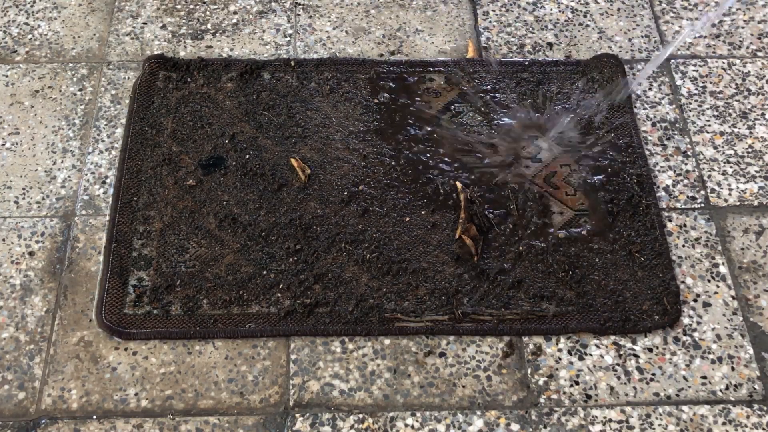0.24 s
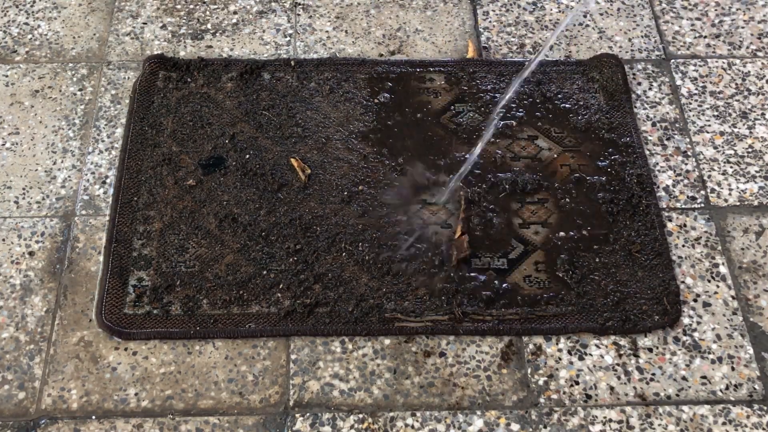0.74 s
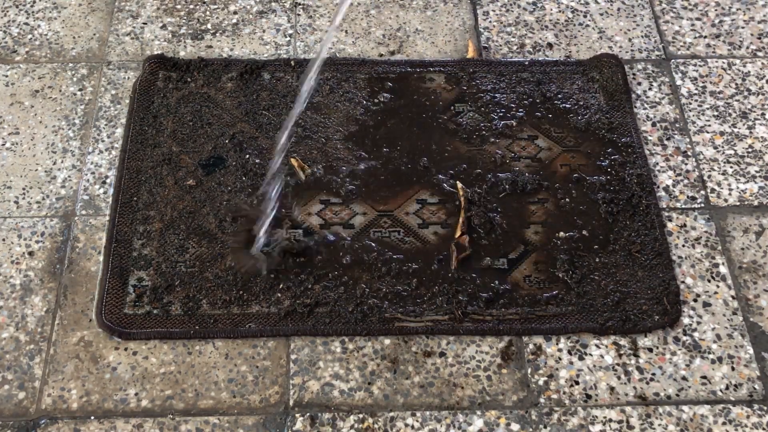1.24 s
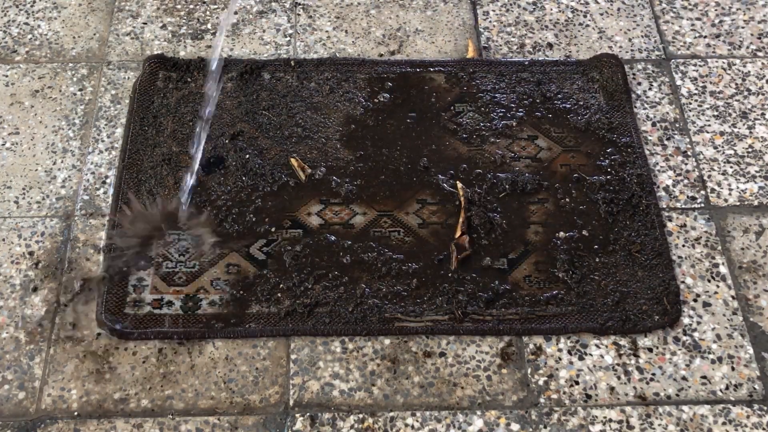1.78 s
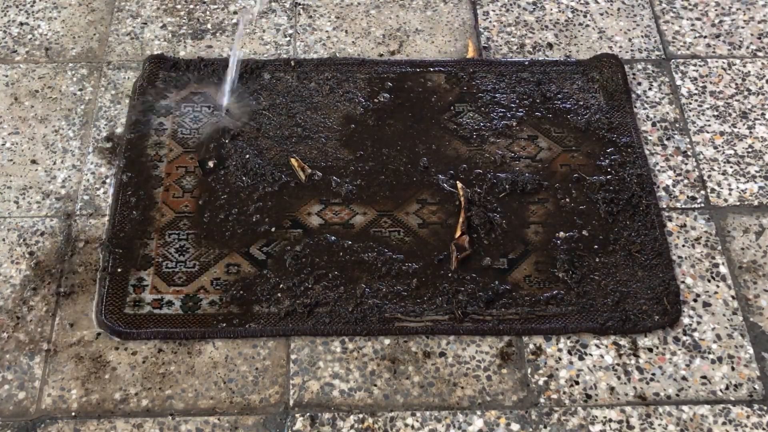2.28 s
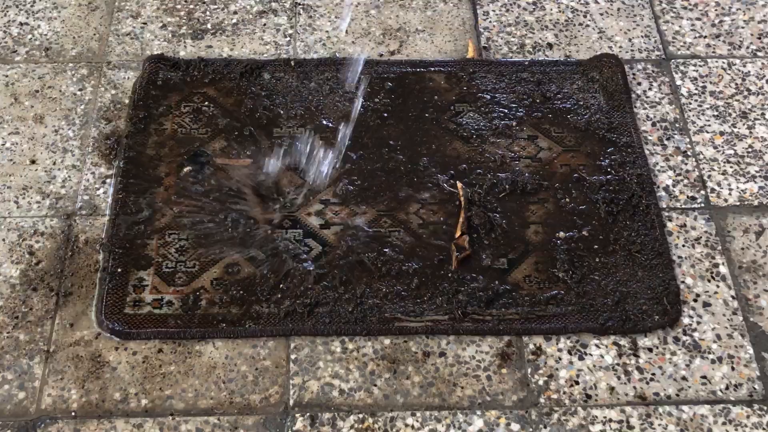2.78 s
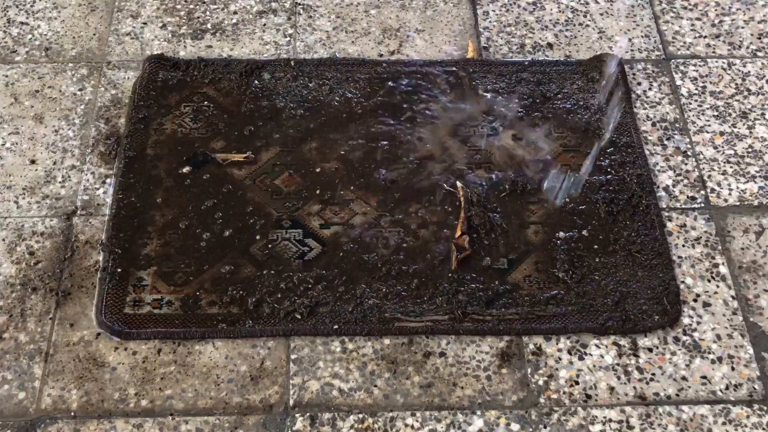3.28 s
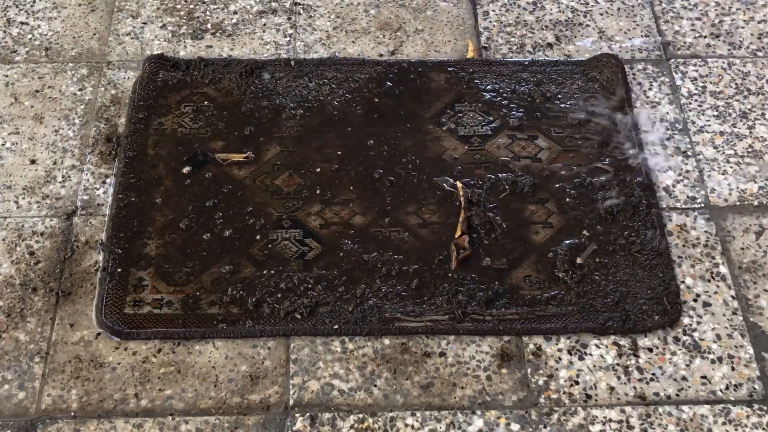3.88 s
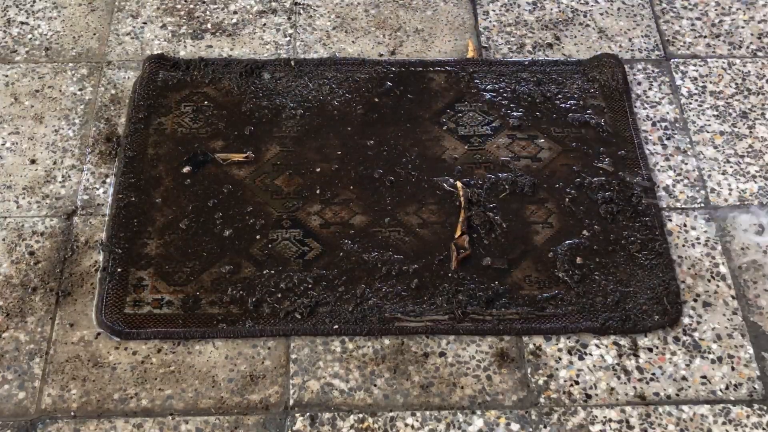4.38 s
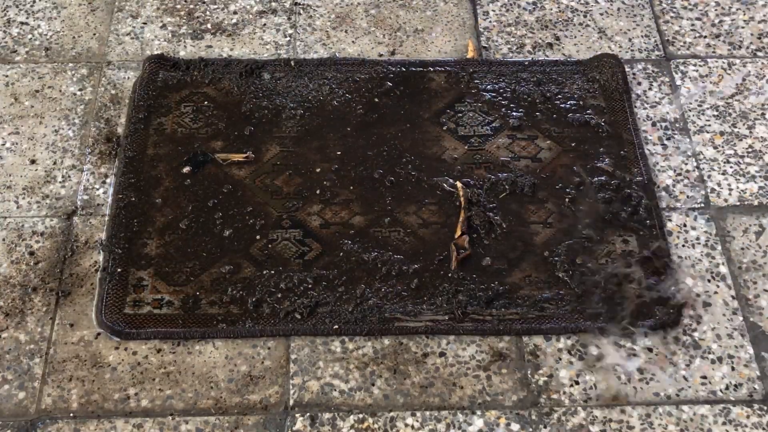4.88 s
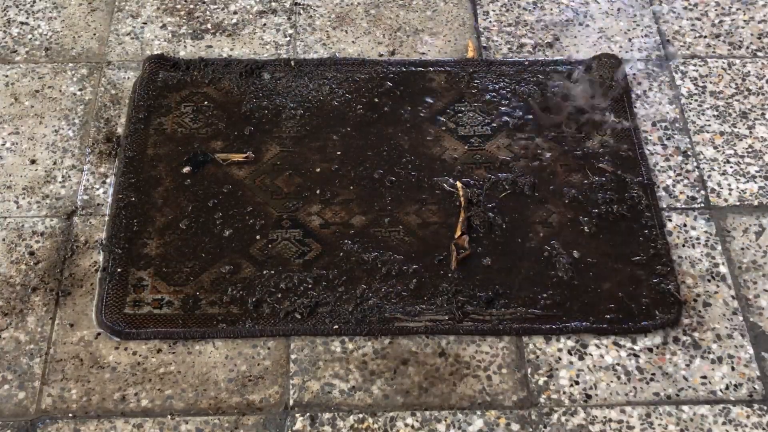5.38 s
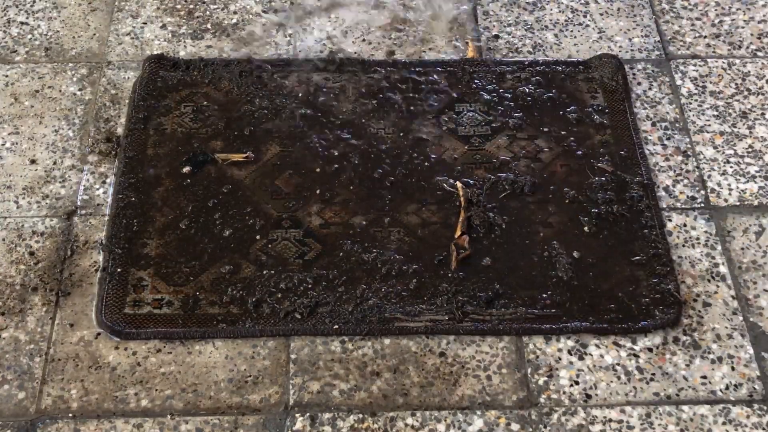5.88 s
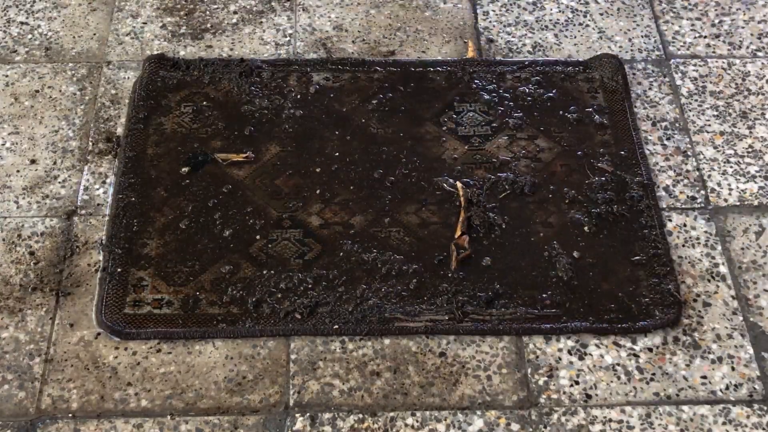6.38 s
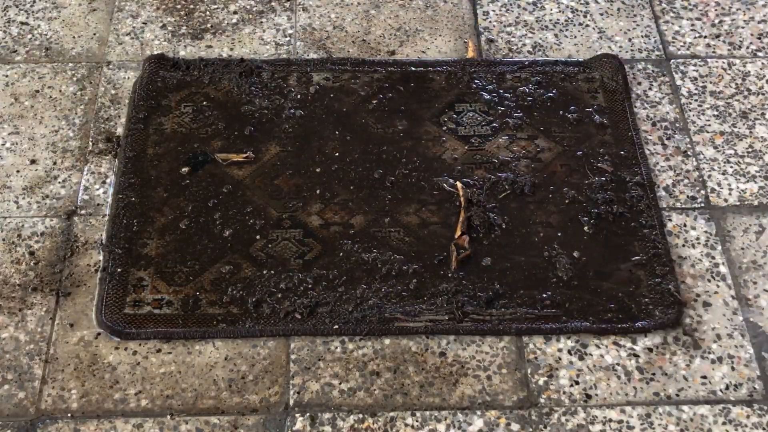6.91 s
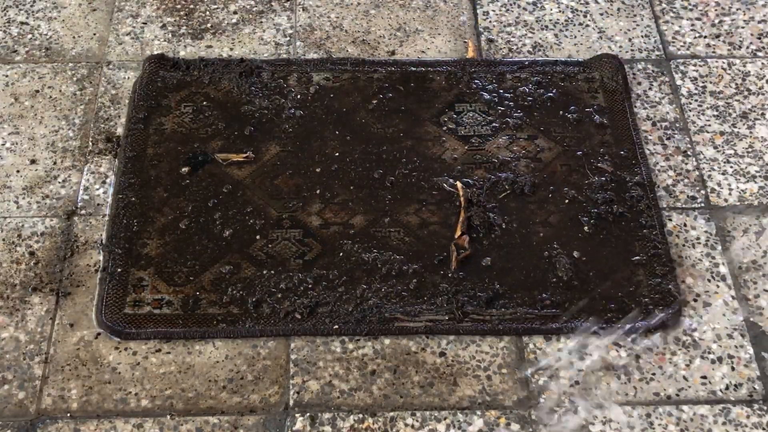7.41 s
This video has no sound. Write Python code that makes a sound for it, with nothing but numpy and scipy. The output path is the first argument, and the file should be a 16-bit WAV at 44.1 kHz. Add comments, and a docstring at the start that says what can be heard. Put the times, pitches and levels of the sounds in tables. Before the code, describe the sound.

Close, bright water spatter in a reverberant hard space: light patter at first, then dense sharp splats as the stream whips across a sodden mat, with a brief hollow swash just after three seconds. Later, irregular slaps and plinking drops rise and fall, strongest near six seconds. Soft muffled drumming, beating low tones and quiet rumble stay underneath throughout.

```python
"""A patter of drops and fine mist: a water jet sweeps over a soaked rug and the tiles around it.
Noise drums dully as on wet pile; two sine tones hum, a narrow resonance drones, filtered noise rumbles.
From 0.19 s lumps of water slap down, each a burst of cracks, a ring of trapped air and some spatter.
Decaying noise echoes draw each slap out into a short hiss, as in a hard-walled room.
A hollow noise swash passes at 3.2 s; the whole level dips briefly at 4.71 s."""
import sys
import numpy as np
from scipy import signal
from scipy.fft import rfft, irfft, next_fast_len
from scipy.io import wavfile

SR = 44100
rng = np.random.default_rng(int(sys.argv[2]) if len(sys.argv) > 2 else 0)


def log_audio(samples):
    """Write samples as a 16-bit WAV file to the path given in sys.argv[1]."""
    # one column per channel
    frames = np.atleast_2d(samples).T
    # limit to full scale, then quantise
    limited = np.clip(frames, -1, 1)
    pcm = np.round(limited * 32767).astype(np.int16)
    wavfile.write(sys.argv[1], SR, pcm)


N = 337365
TIME = np.arange(N) / SR


def amp(db):
    """Decibels to gain."""
    return 10 ** (np.asarray(db) / 20)


def evened(x):
    """Scales to an rms of 1."""
    return x / np.sqrt(np.mean(x ** 2) + 1e-20)


def read(points, hz):
    """Reads a spectrum on a log-frequency axis."""
    f, value = np.transpose(points)
    return np.interp(np.log(hz + 1), np.log(f + 1), value)


def read_gain(points, hz):
    """A spectrum in dB as gains."""
    return amp(read(points, hz))


def curves(rows):
    """Each column of a timed table, sample by sample."""
    s, *columns = np.transpose(rows)
    return [np.interp(TIME, s, column) for column in columns]


def add(mix, s, sound):
    """Mixes a sound in at s seconds."""
    part = mix[max(round(s * SR), 0):][:len(sound)]
    part += sound[:len(part)]


def noise(gain):
    """Noise of rms 1 whose spectrum is the function gain(Hz)."""
    size = next_fast_len(N)
    spectrum = rfft(rng.standard_normal(size))
    hz = np.fft.rfftfreq(size, 1 / SR)
    return evened(irfft(spectrum * gain(hz), size)[:N])


def wander(rate_hz):
    """Slow random drift of rms 1, low-passed near rate_hz."""
    return noise(lambda hz: 1 / (1 + (hz / rate_hz) ** 4))


def pocket(hz, cycles, glide, size=1024):
    """Trapped air rings for a few cycles with unit energy, rising a little as it nears the surface."""
    turns = np.arange(size) * hz / SR
    age = turns / cycles
    bend = 1 + glide * np.tanh(age / 4) - glide / 2
    ring = age * np.exp(-age) * np.sin(2 * np.pi * turns * bend)
    return ring / np.linalg.norm(ring)


def splat(centre_hz, octaves, low_hz=1050, size=512):
    """One impact of unit energy: a sharp crack of a few cycles, with little bass as it is so small."""
    hz = abs(np.fft.fftfreq(size, 1 / SR)) + 1
    gain = (1 + np.square(np.log2(hz / centre_hz) / octaves) / 8) ** -2
    gain = gain / np.sqrt(1 + (low_hz / hz) ** 5)
    log_gain = np.log(np.maximum(gain / gain.max(), 1e-3))
    # minimum phase: the energy comes at the onset
    minimum_phase = np.exp(np.conj(signal.hilbert(log_gain)))
    crack = np.fft.ifft(minimum_phase).real[:size // 2]
    return crack / np.linalg.norm(crack)


def spatter(low_hz, high_hz, level_db=-27, peak_s=0.034):
    """Power of the drops that fall back after the slaps whose air pocket rings in this range."""
    power = np.zeros(N)
    age = TIME[:SR] / peak_s
    for s, _, _, air_db, air_hz, _ in SLAPS:
        if low_hz <= air_hz < high_hz:
            add(power, s, amp(air_db + level_db) ** 2 * age * np.exp(-age))
    return power


def drops(level_db, surge, low_hz, high_hz, per_s, spread_db, crack_share, clump, patchy_db, count=32):
    """Drops of one size class land thicker with each surge; most are faint, and the favoured pitches drift."""
    rate_per_s = per_s * np.exp(clump * surge - clump ** 2 / 2)
    lands = np.flatnonzero(rng.random(N) < rate_per_s / SR)
    weight_db = spread_db * np.minimum(rng.exponential(1, N), 2.4)
    weight = amp(weight_db) * rng.choice([-1, 1], N)
    kind = rng.integers(0, count, N)
    knots = np.arange(0, N, SR // 14)
    out = np.zeros(N + SR)
    for k, hz in enumerate(np.geomspace(low_hz, high_hz, count)):
        tick = pocket(hz, rng.uniform(0.25, 3.5), 0.094)
        add(tick, 0, crack_share * splat(hz, 0.88))
        at = lands[kind[lands] == k]
        favour = amp(patchy_db * np.interp(at, knots, rng.uniform(-0.53, 1, len(knots))))
        ticks = (weight[at] * favour)[:, None] * tick
        np.add.at(out, at[:, None] + np.arange(len(tick)), ticks)
    return np.sqrt(amp(level_db) ** 2 + spatter(low_hz, high_hz)) * evened(out[:N])


# How hard the jet splashes, soft on deep pile and loud on puddles and tile.
# Each row: time in seconds, spray level in dB before gush and class trims, extra for large drops in dB.
SPRAY_LEVELS = [(0, -38.5, 7.5), (.12, -53, -4), (.7, -44.5, 1), (.92, -64, 4), (1.3, -55, 13),
                (1.52, -53.5, -15), (1.8, -54, 7), (2.22, -50, 2), (2.55, -43, 4.5), (2.95, -43, 1.5),
                (3.55, -40.5, -1), (3.78, -44, 1.5), (3.98, -39, -16), (4.35, -50.5, 10.5),
                (4.98, -39.5, -7.5), (5.35, -51, 0), (5.98, -35, 1), (6.38, -45.5, -2), (6.62, -40.5, -27),
                (7.3, -39.5, 3), (7.65, -43, -17)]


def spray(mist_db=-19, large_db=-8.5, middling_db=0, gush_hz=11, gush_db=1):
    """The uneven jet throws all sizes of drop at once; the smaller the drop, the higher its tick."""
    spray_db, coarse_db = curves(SPRAY_LEVELS)
    spray_db = spray_db + gush_db * wander(gush_hz)
    # fine drops follow the spray only in part: -41.5 dB at an ordinary splash of -42 dB
    fine_db = -41.5 + 0.41 * (spray_db + 42)
    surge = np.minimum(noise(lambda hz: hz / (hz + 22) / (1 + (hz / 90) ** 4)), 1.7)
    large = drops(spray_db + coarse_db + large_db, surge, 1725, 3570, per_s=280, spread_db=5.0,
                  crack_share=1.0, clump=0.7, patchy_db=2)
    middling = drops(spray_db + middling_db, surge, 3380, 7920, per_s=330, spread_db=6.5,
                     crack_share=0.81, clump=0.7, patchy_db=3)
    fine = drops(fine_db, surge, 7480, 14000, per_s=400, spread_db=8.5,
                 crack_share=0.72, clump=0.92, patchy_db=0)
    mist = amp(fine_db + mist_db) * noise(lambda hz: np.exp(-np.log2((hz + 1) / 9000) ** 2))
    return large + middling + fine + mist


# Ring of the room. Each row: frequency in Hz, t60 in seconds.
ROOM_T60 = [(300, 0.47), (2000, 0.43), (5000, 0.62), (9000, 0.48), (16000, 0.36)]
# Strength of the echo. Each row: frequency in Hz, gain in dB.
ECHO_GAIN = [(500, -3), (2000, -6), (5000, -4), (9000, -4.5), (12000, -4.5), (16000, -9)]


def room(x, gap_s=0.0029, count=3):
    """Diffuse echoes, the top treble dying first; their pattern changes as the jet moves about."""
    out = np.zeros(N)
    for k in range(count):
        hz, t, z = signal.stft(rng.standard_normal(SR), SR, nperseg=256)
        decay = amp(-60 * t / read(ROOM_T60, hz)[:, None])
        energy = np.sum(decay ** 2, axis=1) * t[1] * SR
        decay *= (read_gain(ECHO_GAIN, hz) / np.sqrt(energy))[:, None]
        onset = 1 - np.exp(-(TIME[:SR] / gap_s) ** 2)
        tail = signal.istft(z * decay, SR)[1][:SR] * onset
        # crossfade between tails at constant total power
        share = np.sqrt(2 / count) * np.cos(np.pi * (1.288 * TIME + k / count))
        out += signal.fftconvolve(x * share, tail)[:N]
    return out


# Jet drumming on the pile. Each row: time in seconds, level in dB before trim and flutter.
DRUMMING_LEVEL = [(0, -52.5), (.9, -51.5), (1.1, -48), (2.2, -48.5), (3.3, -46.5), (4.2, -48), (4.6, -49),
                  (5.3, -49), (5.9, -49), (6.3, -48.5), (7.65, -49)]
# Colour of the drumming. Each row: frequency in Hz, relative level in dB per Hz.
PILE_COLOUR = [(25, -45), (60, -20), (110, 3), (190, -1), (220, -6), (250, -1.5), (310, -1), (400, -5),
               (560, -6.5), (800, -9), (1100, -10), (2000, -19.5), (5000, -16.5)]


def drumming(trim_db=3.5, flutter_db=0.5, flutter_hz=22):
    """The uneven jet beats on the soft wet pile: coloured noise with a fluttering level."""
    level_db, = curves(DRUMMING_LEVEL)
    gain = amp(level_db + trim_db + flutter_db * wander(flutter_hz))
    return gain * noise(lambda hz: read_gain(PILE_COLOUR, hz))


# Pitch of the hum. Each row: time in seconds, mean lower tone in Hz, mean upper tone in Hz.
HUM_TONES = [(0, 129, 149.6), (.8, 126.1, 151.7), (1.8, 129.6, 151.7), (3, 129.7, 154), (4.5, 132, 154.4),
             (7.65, 132.2, 159.3)]
# Lower tone. Each row: time in seconds, level in dB before trim and waver.
LOWER_TONE_LEVEL = [(0, -54), (.8, -60), (1.08, -44.5), (1.5, -44), (1.88, -38), (2.1, -45), (2.27, -36),
                    (2.6, -50), (3.12, -40.5), (3.72, -46.5), (4.2, -44.5), (4.45, -34.5), (4.95, -51),
                    (5.22, -54), (5.47, -40), (6.15, -51.5), (7.0, -49.5), (7.65, -56)]
# Upper tone. Each row: time in seconds, level in dB before trim and waver.
UPPER_TONE_LEVEL = [(0, -71), (.3, -38.5), (.95, -50), (1.68, -41.5), (2.5, -52.5), (4.15, -57), (4.6, -56),
                    (6.3, -61), (7.25, -48), (7.65, -58)]


def hum(trim_db=-3.5, waver_hz=0.77, waver_db=1.0):
    """Two close low sine tones waver in pitch and level, and beat."""
    levels_db = curves(LOWER_TONE_LEVEL) + curves(UPPER_TONE_LEVEL)
    out = np.zeros(N)
    for db, hz in zip(levels_db, curves(HUM_TONES)):
        gain = amp(db + waver_db * wander(6.2))
        turns = np.cumsum(hz + waver_hz * wander(11.5)) / SR
        out += gain * np.sin(2 * np.pi * turns)
    return amp(trim_db) * np.sqrt(2) * out


# Faint hollow drone that comes and goes as the jet swings about.
# Each row: time in seconds, level in dB, resonance in Hz.
DRONE_COURSE = [(0, -58, 299.7), (.3, -55.5, 299.8), (.7, -58, 296.8), (1.8, -65, 280.3), (2.2, -53, 281.7),
                (2.7, -51, 286.2), (2.95, -56.5, 289.5), (3.35, -59, 303.8), (3.55, -47, 298),
                (3.7, -52, 309.5), (4.1, -53, 349.9), (4.4, -59, 348.5), (4.7, -67, 299), (6.2, -59, 270.3),
                (6.6, -53, 266), (7.65, -54.5, 263.2)]


def drone(width_share=0.22):
    """A low hollow resonance glides slowly, wider as it rises: a carrier with random quadratures."""
    level_db, hz = curves(DRONE_COURSE)
    # drift runs faster as the pitch rises, so the band widens
    warped = np.cumsum(hz) / hz.max()
    half_width_hz = width_share * hz.max() / 2
    wobble = [np.interp(warped, np.arange(N), wander(half_width_hz)) for _ in range(2)]
    angle = 2 * np.pi * np.cumsum(hz) / SR
    return amp(level_db) * (wobble[0] * np.cos(angle) + wobble[1] * np.sin(angle))


# Loudness of the rumble. Each row: time in seconds, level in dB.
RUMBLE_LOUDNESS = [(0, -51.5), (3.85, -52), (4.2, -49), (4.9, -52.5), (6.2, -50), (7.65, -53)]
# Colour of the rumble. Each row: frequency in Hz, relative level in dB per Hz.
RUMBLE_COLOUR = [(15, -36), (30, -18), (40, -16), (49, 6.5), (60, -4.5), (80, -1.5), (105, -2.5), (140, -1),
                 (300, -12.5), (1000, -48)]


def rumble():
    """The room's own deep rumble: coloured noise with slow swells."""
    level_db, = curves(RUMBLE_LOUDNESS)
    return amp(level_db) * noise(lambda hz: read_gain(RUMBLE_COLOUR, hz))


# Loud slaps; levels are over a millisecond, the air pocket's before its bass cut.
# Each row: start in seconds, crack level in dB, crack centre in Hz, air pocket level in dB,
# air pocket pitch in Hz, ring time in cycles.
SLAPS = [(0.1923, -29, 3000, -29, 4900, 0.72), (0.4087, -23, 4940, -31.5, 2850, 1.9),
         (0.498, -25, 5400.0, -27, 8620.0, 1.3), (0.6456, -37, 7600.0, -19.5, 4620, 0.83),
         (0.7226, -25, 7160, -36, 10700, 2.0), (0.8677, -27.5, 6300.0, -43, 8120.0, 2.6),
         (0.948, -37, 4000.0, -28, 9270.0, 0.6), (1.1997, -27.5, 5700.0, -38, 5700, 2.6),
         (1.254, -23, 7000.0, -27, 3500, 0.87), (1.2613, -30, 6700.0, -31, 8100.0, 1.2),
         (1.3175, -25, 7500.0, -41, 7250, 1.1), (1.6232, -39, 12100.0, -31, 10760.0, 1.2),
         (1.6653, -25, 12100.0, -25, 7800, 2), (1.7529, -35, 3700.0, -21, 9420.0, 0.46),
         (1.7717, -28, 12100.0, -23, 8600.0, 0.49), (1.8164, -21, 12100.0, -12, 4460, 0.41),
         (1.8632, -34, 4100.0, -26, 6950, 1.1), (1.948, -23, 9300.0, -25, 9900, 3.4),
         (1.98, -28, 5800.0, -37, 6720.0, 1.2), (2.124, -29, 7600.0, -27, 14610.0, 2.6),
         (2.1437, -29.5, 5750, -23, 8850, 0.84), (2.2377, -23, 5560, -33, 7800, 0.3),
         (2.3797, -25, 9500.0, -23.5, 3360, 0.53), (2.4575, -33, 8800.0, -26, 2600, 0.55),
         (2.4735, -22, 6000.0, -24.5, 2240.0, 0.91), (2.5586, -22.5, 6600.0, -34, 8100, 2.6),
         (2.5756, -21, 2690, -26.5, 5600, 1.6), (2.5902, -34, 5200.0, -25, 7640, 1.2),
         (2.6253, -39, 4360, -16, 12900, 0.65), (2.6905, -25, 9200.0, -23, 4790.0, 0.9),
         (2.7939, -35, 4400.0, -29, 2040.0, 0.8), (2.8097, -20, 3460, -38, 4160, 3.4),
         (2.8378, -18, 8900.0, -29, 7460, 0.9), (2.8843, -22, 7100.0, -30, 6680.0, 2.6),
         (2.8971, -27, 5600.0, -22, 1900, 0.46), (2.915, -26, 5100.0, -26, 3270.0, 1.2),
         (2.9987, -17, 4230, -24, 4280, 1.9), (3.0606, -24.5, 2100.0, -15.5, 10400, 0.25),
         (3.1212, -14, 4060, -35, 3840, 3.5), (3.2787, -33, 5400.0, -26.5, 4130.0, 1.1),
         (3.3, -21, 8100.0, -33, 8100.0, 1.2), (3.3899, -22, 6200.0, -12, 8950, 0.9),
         (3.4032, -23, 6600.0, -15, 2120, 0.45), (3.4064, -29, 4900.0, -22, 2410.0, 1.2),
         (3.4534, -21.5, 3500.0, -26, 4940.0, 1.1), (3.5387, -20, 3560, -24, 4740, 1.9),
         (3.5808, -34, 8600.0, -31, 12750.0, 1.3), (3.685, -22, 4350, -35, 8570.0, 2.6),
         (3.7471, -41, 13400.0, -26, 4000.0, 0.6), (3.8267, -46, 8500, -21.5, 8200, 1.3),
         (3.8947, -30, 6500.0, -24.5, 2160.0, 0.7), (3.994, -27, 7400.0, -27, 3360, 0.65),
         (4.0584, -38, 4800.0, -27, 6800, 0.95), (4.1113, -23.5, 5900, -23, 6400, 3),
         (4.138, -29, 5100.0, -20, 2400, 0.94), (4.2, -24, 9400.0, -20, 2480, 0.73),
         (4.2737, -24, 3300.0, -25, 2860, 1.8), (4.3007, -26, 9700.0, -23.5, 3870.0, 0.5),
         (4.381, -22, 5100.0, -29, 5500, 2.9), (4.4166, -28, 6300.0, -34, 8700, 1.2),
         (4.453, -22.5, 4600, -43, 5000.0, 2.6), (4.4957, -25.5, 4300.0, -23.5, 3560, 0.45),
         (4.6291, -20, 4450, -32, 4460, 2.9), (4.6648, -25.5, 5430, -26, 5600.0, 0.73),
         (4.8164, -34, 3900.0, -26, 11700.0, 0.55), (4.829, -30, 7600.0, -26.5, 2580, 0.99),
         (4.8605, -24, 7200.0, -28, 3780.0, 1.2), (4.8856, -20, 6360, -30, 6460.0, 0.61),
         (4.9103, -23, 8000.0, -17.5, 4350, 0.64), (5.0852, -29.5, 3200.0, -26, 9480, 0.5),
         (5.1438, -22.5, 3300.0, -35, 4050, 1.9), (5.33, -22, 5700.0, -33, 7820.0, 2.1),
         (5.4564, -24, 4420, -34, 4540, 2.1), (5.4957, -28, 5100.0, -28.5, 2640, 1.6),
         (5.5697, -31, 7600.0, -21.5, 3150, 0.38), (5.5931, -23, 3000.0, -37, 2320, 1.7),
         (5.6174, -22.5, 4800.0, -34, 6000.0, 2.6), (5.6543, -26, 8000.0, -37, 9590.0, 2.6),
         (5.6787, -21, 3550, -27, 9250, 0.42), (5.805, -22.5, 5140, -25.5, 2580, 1.5),
         (5.858, -24, 4800.0, -27, 1740.0, 0.39), (5.895, -25, 5400.0, -20, 8100, 1.5),
         (5.9191, -28, 2300.0, -27, 1770, 0.7), (5.9307, -18.5, 3800.0, -37, 4800, 2.8),
         (6.1032, -25.5, 4300.0, -21.5, 5800, 0.94), (6.1855, -32, 1710, -23, 3330, 0.67),
         (6.2109, -33, 5100.0, -23.5, 5530, 1.2), (6.2875, -26, 4700.0, -24, 4260, 0.79),
         (6.4413, -34, 5200.0, -25, 4010.0, 0.94), (6.4594, -23, 5100.0, -27, 2780.0, 1.2),
         (6.4679, -23, 9200.0, -21.5, 2700, 1.5), (6.5767, -31, 3900.0, -26, 2950, 2.4),
         (6.608, -31, 6200.0, -18, 2250, 0.45), (6.6228, -29, 5800.0, -27, 5680.0, 1.2),
         (6.7171, -22, 7200.0, -30, 4760, 2.6), (6.8621, -23, 7300.0, -24, 3000.0, 0.88),
         (6.993, -27, 8300.0, -35, 8270.0, 1.2), (7.0662, -24, 7600.0, -15.5, 11500, 0.77),
         (7.0777, -24, 6900.0, -24, 5980.0, 1.3), (7.0899, -26, 5600.0, -27, 3100, 0.97),
         (7.1276, -27, 6900.0, -28, 6800, 2.0), (7.1413, -29, 7000.0, -24, 7060.0, 1.2),
         (7.2396, -37, 5800.0, -26.5, 2730, 0.5), (7.2537, -34, 5400.0, -24.5, 2760, 1.4),
         (7.3023, -21, 3700, -26, 12010.0, 1.1), (7.6246, -19, 6400.0, -27, 7680.0, 3.2)]


def slaps(crack_db=0, pocket_db=0, octaves=0.6, glide=0.064, splinter_db=-6, splinter_s=0.0004, count=4):
    """Each lump of water breaks as it lands, in a tight burst of cracks, and rings the air under it."""
    out = np.zeros(N)
    unit = np.sqrt(SR / 1000)  # unit energy to rms 1 over a millisecond
    chance = rng.random((len(SLAPS), count, 3))
    for (s, db, hz, air_db, air_hz, cycles), splinters in zip(SLAPS, chance):
        burst = np.zeros(SR // 50)
        add(burst, 0, splat(hz, octaves))
        for delay, weight, pitch in splinters:
            delay_s = -splinter_s * np.log(1 - delay)
            gain = amp(splinter_db) * (2 * weight - 1)
            add(burst, delay_s, gain * splat(hz * 2 ** (pitch - 0.5), 0.39))
        add(out, s, unit * amp(db + crack_db) * burst / np.linalg.norm(burst))
        small = signal.butter(2, air_hz / 2, "high", fs=SR)  # a small pocket gives off little bass
        ring = signal.lfilter(*small, pocket(air_hz, cycles, glide))
        add(out, s, unit * amp(air_db + pocket_db) * ring)
    return out


# Hollow swash as the jet whips across the rug. Each row: time in seconds, level in dB before flutter.
SWASH_LEVEL = [(3.12, -92), (3.19, -46), (3.235, -52), (3.252, -35), (3.272, -42), (3.29, -43), (3.32, -43),
               (3.36, -49), (3.45, -90)]
# Colour of the swash. Each row: frequency in Hz, relative level in dB per Hz.
SWASH_COLOUR = [(200, -32), (350, -20), (440, 4), (490, -13), (545, -1), (620, -14), (730, -11.5),
                (900, -22), (1500, -25), (4000, -60)]


def swash(flutter_db=1.0, flutter_hz=70):
    """The broken jet patters through the soaked pile: a short, rough, hollow band of noise."""
    level_db, = curves(SWASH_LEVEL)
    gain = amp(level_db + flutter_db * wander(flutter_hz))
    return gain * noise(lambda hz: read_gain(SWASH_COLOUR, hz))


def scene():
    """Splashes with their echo, over the drumming, swash, low tones and rumble."""
    splashes = slaps() + spray()
    wet = splashes + room(splashes)
    return (wet + drumming() + swash() + drone() + hum() + rumble())[None]


# The whole sound dips briefly. Each row: time in seconds, gain in dB.
LEVEL_DIP = [(4.7095, 0), (4.7105, -30), (4.716, -11), (4.724, -4), (4.738, 0)]


def record(dry, edge_hz=15950):
    """One brief dip in level, then a steep low-pass at edge_hz."""
    dip_db, = curves(LEVEL_DIP)
    low_pass = signal.firwin(511, edge_hz, window=("kaiser", 9), fs=SR)
    return signal.oaconvolve(dry * amp(dip_db), low_pass[None], "same")


dry = scene()
out = record(dry)
log_audio(out)
```